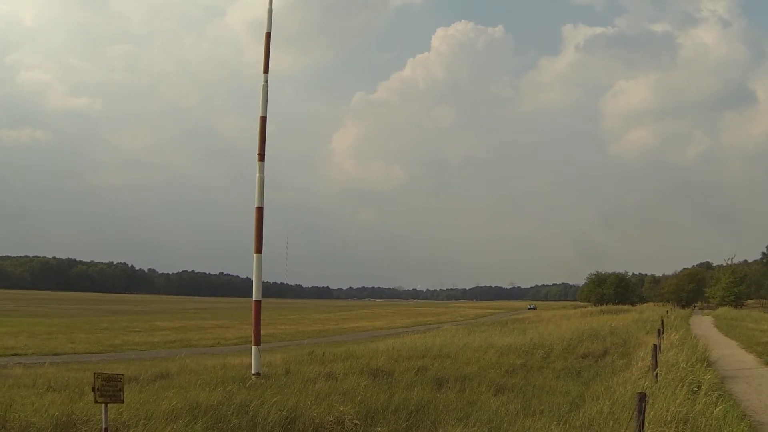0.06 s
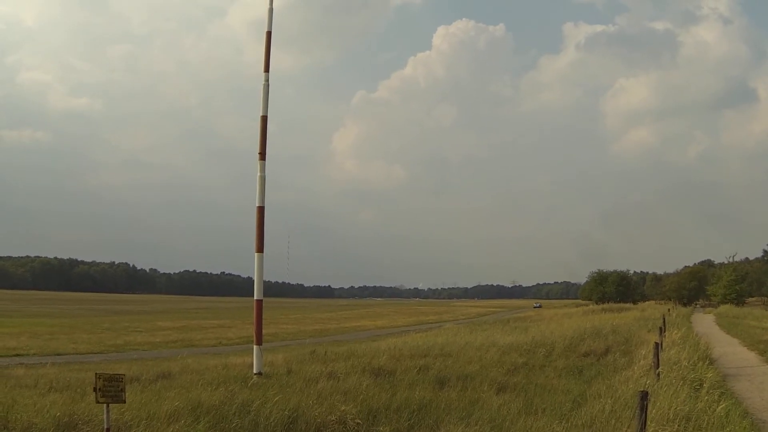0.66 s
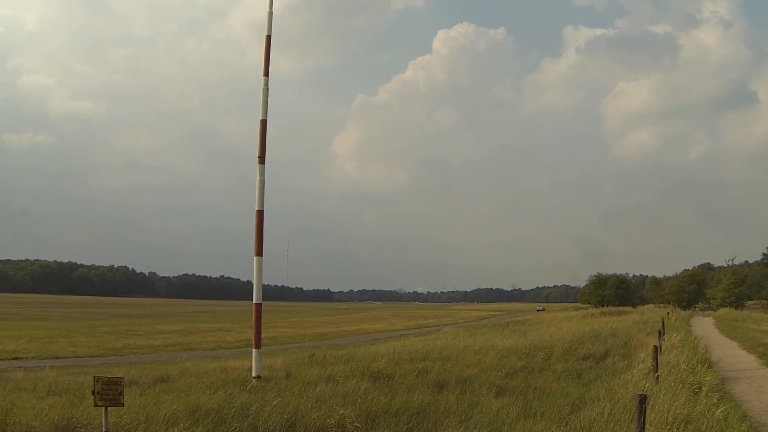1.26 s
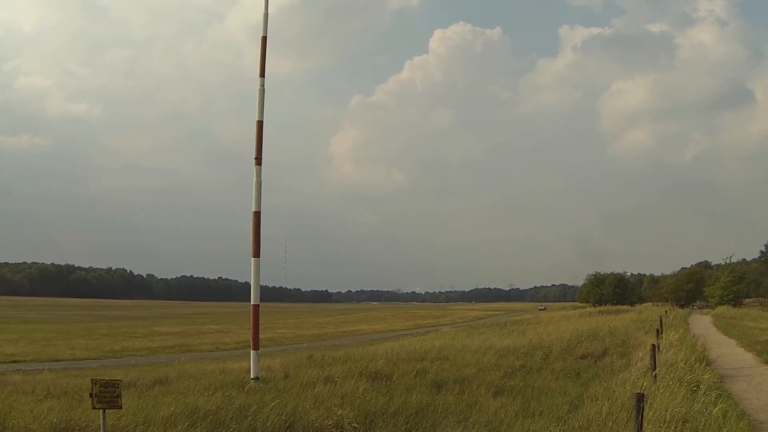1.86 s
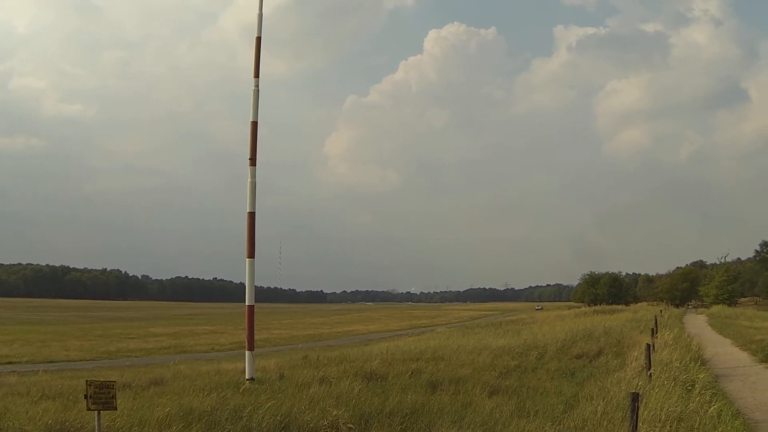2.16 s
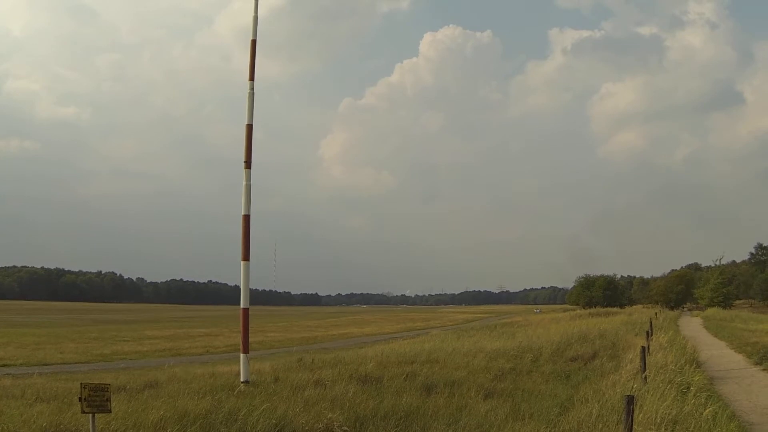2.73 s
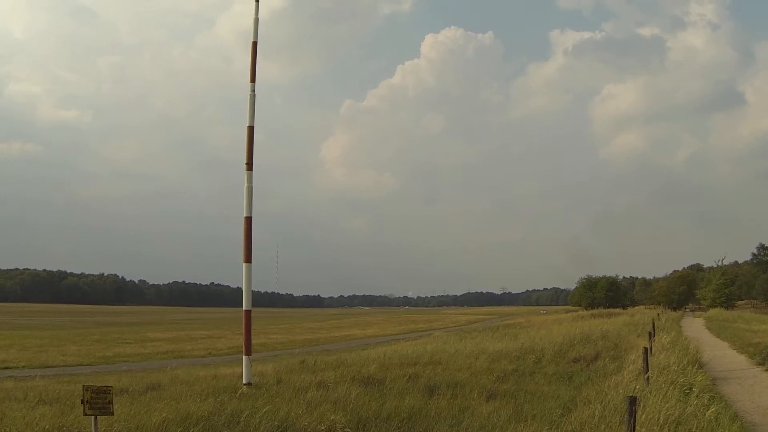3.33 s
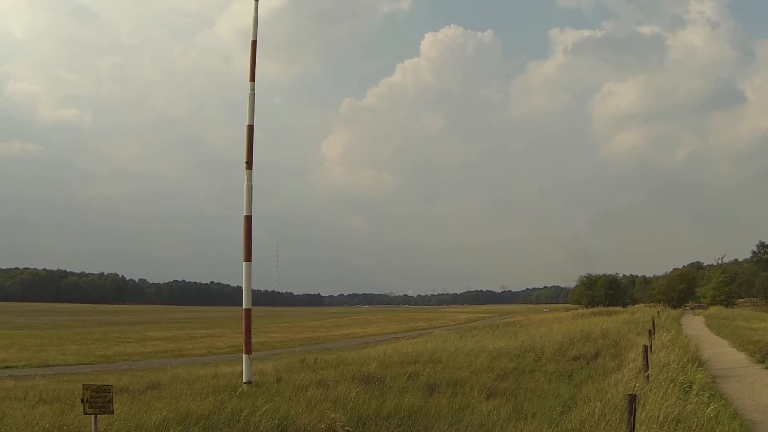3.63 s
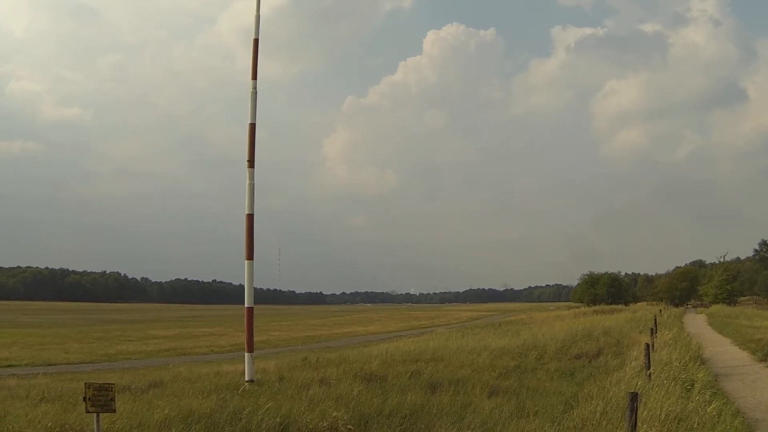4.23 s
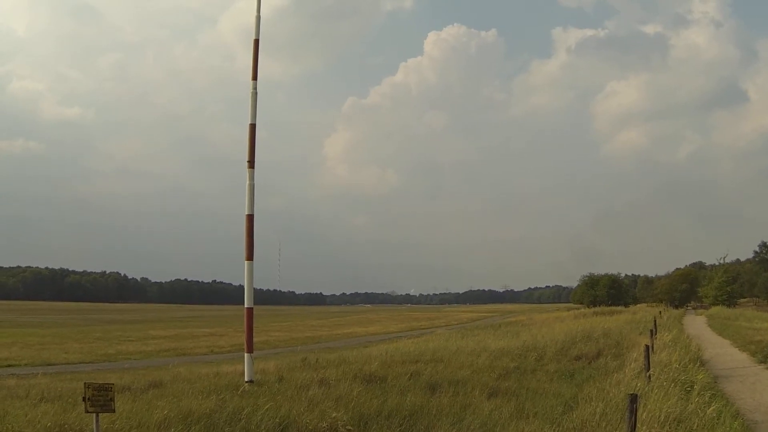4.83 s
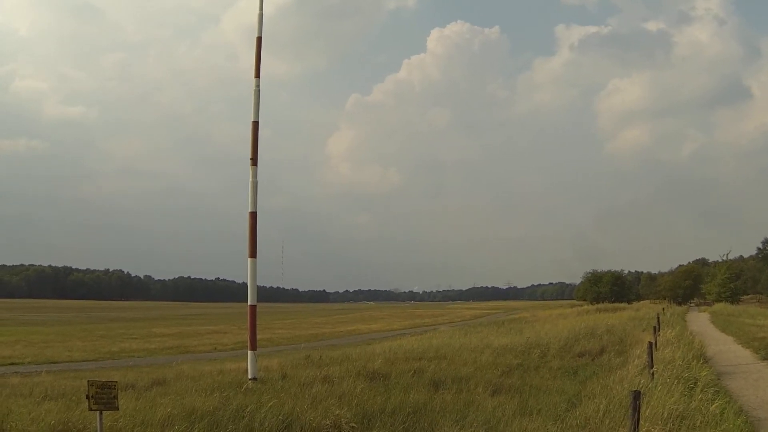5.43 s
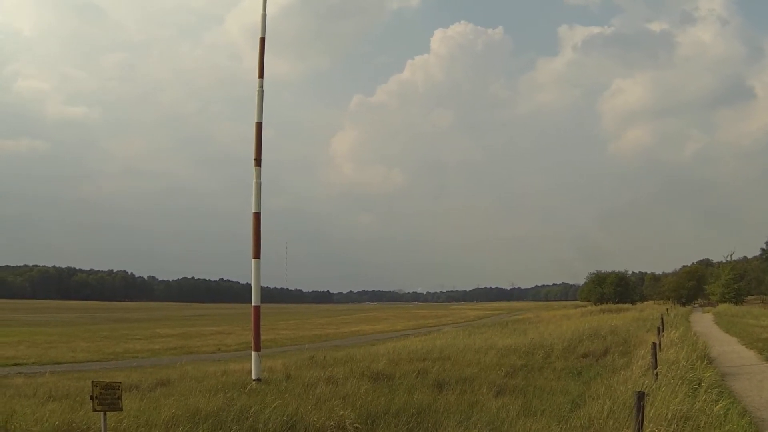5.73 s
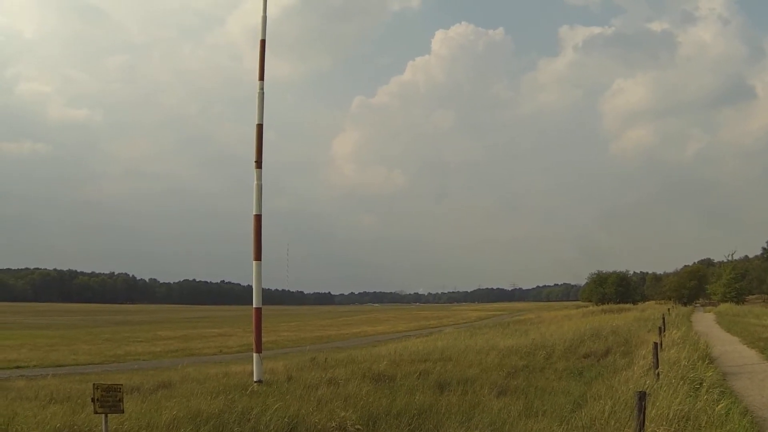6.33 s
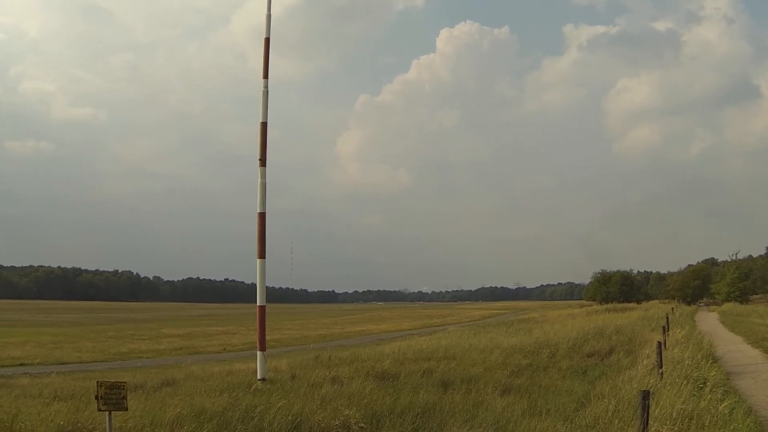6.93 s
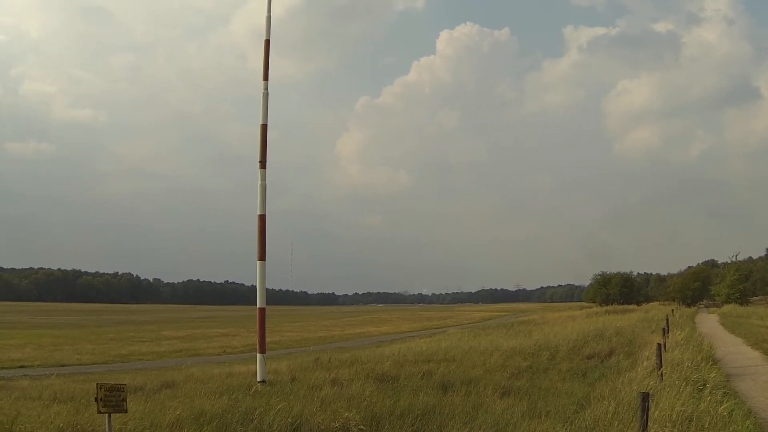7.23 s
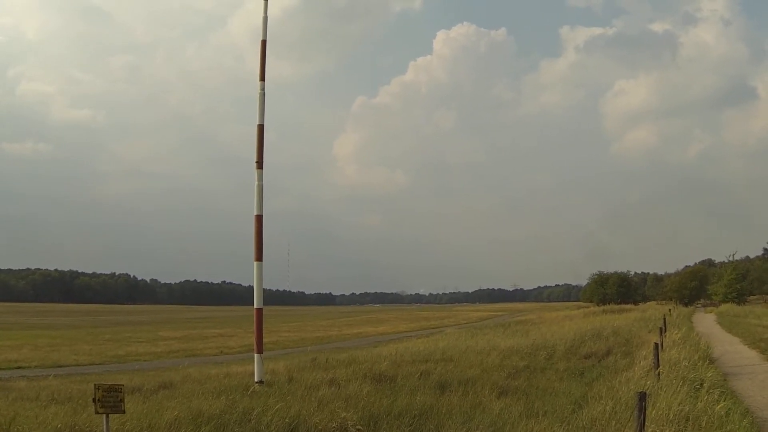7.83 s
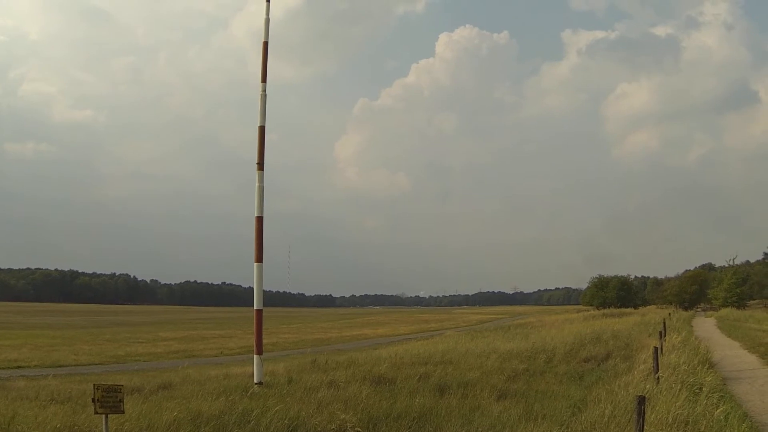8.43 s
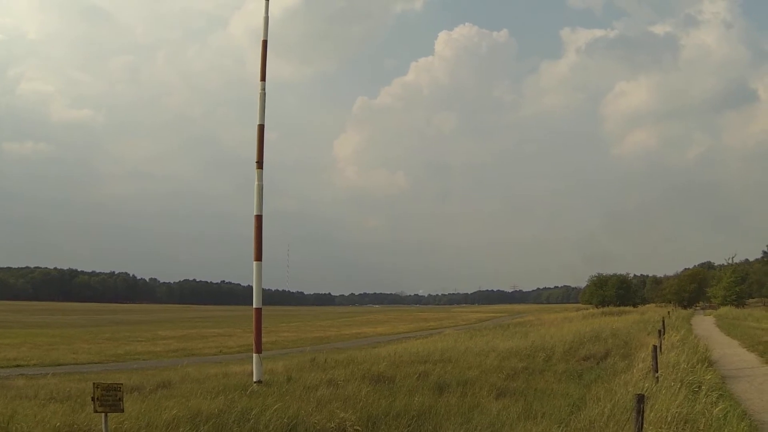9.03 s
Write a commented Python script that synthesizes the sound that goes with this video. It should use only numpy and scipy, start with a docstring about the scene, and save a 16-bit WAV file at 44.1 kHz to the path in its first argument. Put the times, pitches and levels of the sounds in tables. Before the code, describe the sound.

Wind buffets the microphone on an open grassy airfield, making a low rumble with soft thumps. It is strongest at the start, eases, then returns about halfway. Two distant engines drone under a soft, far roar while the grass hisses steadily. Faint insects sizzle and tick, and in the second half a grasshopper rasps about three times a second. A few soft scuffs and one small knock sound close by.

```python
"""Wind gusts buffet the microphone on a grassy summer airfield: eddies make a low rumble and soft thumps. Two
far engines drone and beat against each other under a soft distant roar, and the grass hisses. A grasshopper
rasps leg against wing about three times a second, over a sizzle of others further off, while another insect
flicks its wings in high, thin ticks. Two gusts push with a low murmur, and close by are a soft brush and one
small knock."""
import sys
import numpy as np
from scipy import signal
from scipy.fft import rfft, irfft, next_fast_len
from scipy.io import wavfile
from scipy.ndimage import uniform_filter1d

SR = 44100
rng = np.random.default_rng(int(sys.argv[2]) if len(sys.argv) > 2 else 0)


def persist_wave(psi):
    """Save psi, clipped to +-1, as 16-bit WAV."""
    counts = np.round(np.clip(psi, -1, 1) * 32767).astype(np.int16)
    wavfile.write(sys.argv[1], SR, np.atleast_2d(counts).T)


N = 399987

# The colour of a grasshopper's rasp, near or far. Each row: frequency in Hz, relative level in dB.
RASP_SPECTRUM = [(5000, -17), (7500, -2.5), (9000, 1), (10400, 2), (11800, -2), (13200, -5), (14300, -9),
                 (15500, -13)]


def wind():
    """Eddies press on the microphone port; gusts shed small eddies that flutter on the pressure peaks."""
    # The colours of the large and the small eddies. Each row: frequency in Hz, relative level in dB.
    buffet_spectrum = [(12, -2.5), (20, -3), (28, 3), (38, -2), (50, 0), (68, -7), (90, -13.5), (115, -28),
                       (160, -39), (230, -39.5), (330, -49), (600, -53.5), (1500, -64.5)]
    flutter_spectrum = [(55, -1.5), (75, 3), (95, 9), (120, -2.5), (180, -12.5), (240, -20.5), (350, -34),
                        (700, -46)]
    rumble, flutter = gust_strength()
    large = noise(buffet_spectrum)
    large /= running_rms(large, 3000)   # evened out, so the gust alone sets the strength
    small = noise(flutter_spectrum) * running_rms(large, 600)
    small /= running_rms(small, 3000)
    return rumble * large + flutter * small


def gust_strength(breeze_rumble_db=-45, breeze_flutter_db=-58.5, fall_ratio=2.3, turbulence_db=1.8):
    """Gains of rumble and flutter: each gust rises fast and dies more slowly, over a restless breeze."""
    # Gusts on the microphone. Each row: peak time in seconds, rumble in dB, flutter in dB, rise in seconds.
    gusts = [(.022, -26.5, -42, 0.01), (.08, -33, -38, 0.034), (.18, -27, -44.5, 0.031),
             (.33, -28.5, -40.5, 0.027), (.385, -34.5, -38, 0.038), (.52, -34.5, -37.5, 0.03),
             (.62, -31.5, -42, 0.025), (.74, -31, -52.5, 0.037), (.97, -37, -48, 0.14),
             (1.49, -37, -47, 0.034), (1.68, -43.5, -48, 0.067), (1.94, -33, -58, 0.012),
             (2.17, -42, -56, 0.077), (2.55, -42, -49, 0.059), (3.15, -38, -64, 0.064),
             (3.45, -42, -60, 0.08), (3.72, -39.5, -51.5, 0.04), (4.28, -28, -48, 0.016),
             (4.45, -33.5, -60, 0.069), (4.66, -37.5, -50, 0.037), (4.86, -31.5, -38, 0.044),
             (4.96, -32.5, -37, 0.017), (5.03, -38, -56, 0.012), (5.12, -38, -50, 0.066),
             (5.36, -33.5, -44, 0.023), (5.46, -30.5, -40.5, .022), (5.58, -37, -53, .04),
             (5.69, -31, -40.5, 0.029), (5.78, -31, -40.5, 0.031), (5.87, -30, -44, 0.028),
             (6.0, -33, -43, 0.029), (6.075, -37, -40, .022), (6.17, -34, -43, 0.021),
             (6.265, -27.5, -42, 0.0096), (6.40, -35.5, -48, 0.071), (6.525, -28, -37, 0.015),
             (6.6, -29.5, -46, 0.024), (6.74, -31.5, -65, 0.04), (6.86, -35.5, -47, .03),
             (6.96, -33, -38.5, 0.021), (7.06, -31.5, -60, 0.029), (7.42, -43, -63, 0.097),
             (7.6, -38, -53, 0.025), (7.88, -35, -56, 0.01), (8.35, -34.5, -54, 0.027),
             (8.47, -32.5, -45, .04), (8.72, -37, -54, 0.11), (8.92, -33.5, -51, 0.054),
             (9.021, -27.5, -43, .035)]
    t = seconds()
    power = from_db([[breeze_rumble_db], [breeze_flutter_db]]) ** 2 * np.ones(N)
    for peak, rumble_db, flutter_db, rise in gusts:
        at = np.flatnonzero(abs(t - peak) < 10 * rise)
        since = t[at] - peak
        width = np.where(since < 0, rise, rise * fall_ratio)
        power[:, at] += from_db([[rumble_db], [flutter_db]]) ** 2 * np.exp(-(since / width) ** 2)
    return np.sqrt(power) * from_db(turbulence_db * drift(8))


def thumps():
    """A hard eddy sweeps over the port: a quick suction between two softer pushes."""
    # Single hard eddies. Each row: middle in seconds, peak level in dB, length in seconds.
    hard_eddies = [(.079, -20.5, 0.018), (.508, -21, 0.028), (4.968, -26, 0.037), (5.184, -25, 0.027),
                   (5.663, -20.5, 0.039), (5.771, -23, 0.012), (5.842, -20.5, .025), (5.895, -18, 0.027),
                   (6.471, -27, 0.031), (6.629, -29, 0.018), (8.507, -22.5, 0.052)]
    out, t = np.zeros(N), seconds()
    for middle, db, length in hard_eddies:
        at = np.flatnonzero(abs(t - middle) < length * 2)
        offset_squared = (np.pi * (t[at] - middle) / length) ** 2
        out[at] += from_db(db) * (2 * offset_squared - 1) * np.exp(-offset_squared)
    return out


def engines(fade_db=0.14, wander_hz=0.16):
    """Two far drones beat against each other and fade with the air."""
    # The higher engine's course. Each row: time in seconds, pitch in Hz, RMS level of the fundamental
    # in dB, third harmonic in dB against the fundamental.
    high_course = [(0, 155, -68, -34), (1.4, 153.5, -67.5, -33), (2.45, 153.6, -56.5, -27),
                   (3.5, 156.5, -58.5, -20), (5, 157.4, -57.5, -19.5), (6.2, 157.6, -57.5, -18.5),
                   (6.5, 157.8, -54.5, -18), (7.2, 159.8, -57.5, -23), (7.65, 159, -55, -26),
                   (7.95, 158.5, -54, -17), (9.07, 158.6, -54.5, -17)]
    # The lower engine's course. Each row: time in seconds, pitch in Hz, RMS level of the fundamental in dB.
    low_course = [(0, 138.3, -67), (1.4, 138.7, -57.5), (2.1, 138, -59), (2.6, 137.5, -54.5),
                  (3.8, 138.3, -54), (5.2, 139.9, -60.5), (6.4, 138.6, -57.5), (7.3, 140, -51.5),
                  (8.2, 138.9, -57), (9.07, 136.5, -71)]
    # Each engine's other partials. Each row: multiple of the pitch, level in dB against the fundamental.
    high_orders = [(1.5, -19), (2, -18.5), (2.5, -27.5)]
    low_orders = [(.5, 3), (2, -27), (2.5, -20)]
    hz, db, third_db = in_time(high_course)
    high = drone(hz + wander_hz * drift(3.35), high_orders + [(3, third_db)])
    high *= from_db(db + fade_db * drift(4.9))
    hz, db = in_time(low_course)
    low = drone(hz + wander_hz * drift(4.1), low_orders)
    low *= from_db(db + fade_db * drift(8.3))
    return np.sqrt(2) * (high + low)


def drone(pitch_hz, orders, waver_db=2.5):
    """An engine note: a firm fundamental with partials that each waver on their own."""
    phase = 2 * np.pi * np.cumsum(pitch_hz) / SR
    partials = sum(from_db(db + waver_db * drift(4.0)) * np.sin(order * phase) for order, db in orders)
    return np.sin(phase) + partials


def far_roar(low_trim_db=4.0, rush_trim_db=0.76, waver_db=0.62):
    """Distant engine and road noise with gliding whines, wavering in the moving air."""
    # The roar's ebb and flow. Each row: time in seconds, low rumble and rush in dB before their trims.
    levels = [(0, -58, -60), (2.1, -59, -63.5), (2.9, -61.5, -62.5), (4.3, -60, -62.5), (6, -63.5, -64),
              (7.6, -63, -63.5), (9.07, -65.5, -62.5)]
    # The colours of the low rumble and the rush. Each row: frequency in Hz, relative level in dB.
    low_spectrum = [(50, -8), (110, 3.5), (180, 5), (215, 3.5), (260, 0), (290, 0), (330, -1), (385, -5.5),
                    (480, -11), (800, -57)]
    rush_spectrum = [(300, -5.5), (480, -3.5), (620, 0), (780, -0.5), (980, -1.5), (1300, -7), (1900, -12),
                     (3000, -16.5), (6000, -45)]
    # Narrow bands that swell out of the roar. Each row: middle in seconds, length in seconds,
    # centre in Hz, glide in Hz per second, width in Hz, level in dB.
    whines = [(0.144, 2.1, 850, -29.5, 170, -65.5), (0.747, 2.2, 305, -15, 70, -61.5),
              (1.8, 2.7, 803, 1.5, 200, -63.5), (2.2, 0.88, 333.7, 20, 70, -65.5),
              (2.299, 3.7, 976, 24.5, 149, -67.5), (2.902, 2.3, 1120, 23.5, 130, -73),
              (3.818, 0.7, 756, -1, 190, -64.5)]
    low_db, rush_db = in_time(levels)
    out = from_db(low_db + low_trim_db) * noise(low_spectrum)
    out += from_db(rush_db + rush_trim_db) * noise(rush_spectrum)
    for middle, length, hz, glide, width_hz, db in whines:
        at, arch = swell(middle, length)
        centre_hz = hz + glide * (seconds() - middle)
        out[at] += from_db(db) * arch * band(centre_hz, width_hz)[at]
    return out * from_db(waver_db * drift(26.0))


def grass(start_db=-62, ease_db_per_s=0.27, flicker_db=1.0):
    """Countless blades brush together in an even hiss that slowly eases off."""
    # The colour of the hiss. Each row: frequency in Hz, relative level in dB.
    hiss_spectrum = [(1200, 1), (2200, -1.5), (2950, -2.5), (3500, 1), (4300, 2), (5000, 0), (5700, 0.7),
                     (6600, -1.5), (8500, -3), (10300, -5), (11500, -6.5), (12800, -12), (14200, -15),
                     (15500, -27)]
    db = start_db - ease_db_per_s * seconds()
    return from_db(db + flicker_db * drift(72)) * noise(hiss_spectrum)


def grasshopper(trim_db=3.0, chirp_s=0.23, stroke_depth=0.6, unevenness=0.025):
    """Each chirp is a swell of quick leg strokes against the wing."""
    out = np.zeros(N)
    pace = 1 + unevenness * drift(12)
    for middle, db, strokes_per_s in chirps():
        at, arch = swell(middle, chirp_s)
        phase = 2 * np.pi * strokes_per_s * np.cumsum(pace[at]) / SR
        strokes = (1 + stroke_depth * np.sin(phase)) / np.sqrt(1 + stroke_depth ** 2 / 2)   # unit power
        out[at] += from_db(db + trim_db) * arch * strokes
    return out * noise(RASP_SPECTRUM)


def chirps(usual_gap_s=0.3, spread_db=0.7, stroke_spread=0.064):
    """Time, level and stroke rate of each chirp: evenly spaced in runs, no two quite alike."""
    # Runs of chirps. Each row: first and last chirp in seconds, level in dB before the trim,
    # strokes per second.
    runs = [(4.776, 5.716, -70.5, 150), (6.018, 7.109, -75.5, 85), (7.425, 8.965, -69.5, 100)]
    for first, last, db, strokes_per_s in runs:
        count = 1 + round((last - first) / usual_gap_s)
        for middle in np.linspace(first, last, count):
            yield middle, db + rng.normal(0, spread_db), strokes_per_s * (1 + rng.normal(0, stroke_spread))


def ticking_insect(flick_s=0.014):
    """Single flicks of the wings, each a tiny bright burst."""
    # The colour of a flick. Each row: frequency in Hz, relative level in dB.
    flick_spectrum = [(6000, -15), (9000, 4), (11000, 4), (12800, 5), (14300, -7), (15500, -10)]
    out = np.zeros(N)
    for middle, db in ticks():
        at, arch = swell(middle, flick_s)
        out[at] += from_db(db) * arch
    return out * noise(flick_spectrum)


def ticks(first_s=3.1568, gap_s=0.3191, haste_s=0.0004, first_db=-69, growth_db_per_s=1.4,
          faint_per_s=1.0, faint_db=-70):
    """Time and level of each flick: a clock-like beat that grows quicker and louder, plus strays."""
    # The louder flicks out of step. Each row: time in seconds, level in dB.
    strays = [(.142, -64), (2.505, -62), (2.53, -66), (3.332, -68), (8.807, -70)]
    when = first_s
    while when < N / SR:
        yield when, first_db + growth_db_per_s * (when - first_s)
        when += gap_s
        gap_s -= haste_s
    yield from strays
    for when in seconds()[rng.random(N) < faint_per_s / SR]:
        yield when, faint_db


def far_grasshoppers(throb_db=2.0):
    """Many far rasps merge into a softly throbbing sizzle."""
    # The rise and fall of the chorus. Each row: time in seconds, level in dB.
    levels = [(0, -74), (2, -73.5), (4.3, -76), (4.7, -71.5), (6.8, -70), (7.4, -73.5), (9.07, -73)]
    db, = in_time(levels)
    return from_db(db + throb_db * drift(11)) * noise(RASP_SPECTRUM)


def narrow_swells():
    """Brief swells of narrow noise: two gusts push with a low murmur, and one soft brush rustles close by."""
    # Each row: middle in seconds, length in seconds, centre in Hz, width in Hz, level in dB.
    narrow_bands = [(4.655, 0.044, 261.6, 140, -54), (4.69, 0.16, 2090, 900, -66.5),
                    (6.506, 0.052, 230, 120, -53)]
    out = np.zeros(N)
    for middle, length, hz, width_hz, db in narrow_bands:
        at, arch = swell(middle, length)
        out[at] += from_db(db) * arch * band(hz, width_hz)[at]
    return out


def knock(start_s=6.3196, level_db=-44, contact_s=0.00064):
    """One soft touch rings the damped modes of the camera body."""
    # The body's modes. Each row: frequency in Hz, relative level in dB, seconds to die away by 60 dB.
    modes = [(460, -3, .012), (740, -1, .01), (1150, -9, .007)]
    since = np.maximum(seconds() - start_s, 0)
    ring = np.zeros(N)
    for hz, db, t60 in modes:
        ring += from_db(level_db + db - 60 * since / t60) * np.sin(2 * np.pi * hz * since)
    attack = 1 - np.exp(-(since / contact_s) ** 2)
    return ring * attack


def from_db(db):
    """Decibels to gain."""
    return 10 ** (np.asarray(db) / 20)


def unit_power(x):
    """Scale to an RMS of one."""
    return x / np.sqrt(np.mean(x ** 2) + 1e-20)


def running_rms(x, samples):
    """An envelope follower: the RMS over a sliding window."""
    return np.sqrt(uniform_filter1d(x ** 2, size=samples))


def seconds():
    """The time of every sample."""
    return np.arange(N) / SR


def in_time(rows):
    """Automation curves: each column after the time, joined by straight lines."""
    times, *columns = np.transpose(rows)
    return [np.interp(seconds(), times, column) for column in columns]


def noise(spectrum):
    """Unit-power noise coloured by (Hz, dB) points, falling steeply beyond both ends."""
    size = next_fast_len(N)
    hz = np.maximum(np.arange(size // 2 + 1) * SR / size, 1)
    points_hz, db = np.transpose(spectrum)
    skirts = np.minimum(1, np.minimum(hz / points_hz[0], points_hz[-1] / hz)) ** 4
    gain = skirts * from_db(np.interp(np.log(hz), np.log(points_hz), db))
    return unit_power(irfft(rfft(rng.standard_normal(size)) * gain, size)[:N])


def drift(rate_hz):
    """A smooth random wander with a spread of one, mostly slower than rate_hz."""
    hop, settle = 40, 2000   # samples per step; steps for the filter to settle
    pole = np.exp(-2 * np.pi * rate_hz * hop / SR)
    white = rng.standard_normal(N // hop + settle + 2)
    slow = signal.lfilter([1], [1, -2 * pole, pole * pole], white)[settle:]
    return np.interp(np.arange(N) / hop, np.arange(len(slow)), unit_power(slow))


def band(centre_hz, width_hz):
    """Unit-power noise around a centre that may glide."""
    lowpass = signal.butter(2, width_hz / 2, fs=SR, output="sos")
    slow = signal.sosfilt(lowpass, rng.standard_normal((2, N)))
    phase = 2 * np.pi * np.cumsum(centre_hz * np.ones(N)) / SR
    return unit_power(slow[0] * np.cos(phase) + slow[1] * np.sin(phase))


def swell(middle, length):
    """The samples of one event and its arched envelope."""
    at = np.arange(max(0, int((middle - length / 2) * SR)), min(N, int((middle + length / 2) * SR)))
    return at, np.cos(np.pi * (at / SR - middle) / length)


def scene():
    """Open ground in mono: everything arrives without echoes."""
    insects = grasshopper() + far_grasshoppers() + ticking_insect()
    return (wind() + thumps() + far_roar() + engines() + grass() + insects + narrow_swells() + knock())[None]


def record(dry):
    """A steep low-pass shaves off the very top."""
    cutoff_hz = 15250
    return signal.sosfilt(signal.ellip(12, .1, 80, cutoff_hz, fs=SR, output="sos"), dry)


dry = scene()
out = record(dry)
persist_wave(out)
```